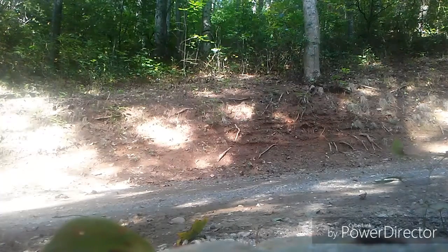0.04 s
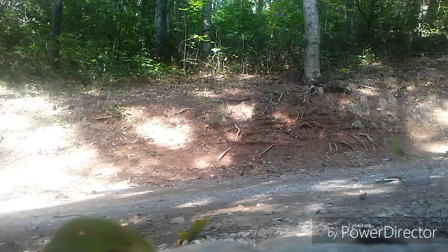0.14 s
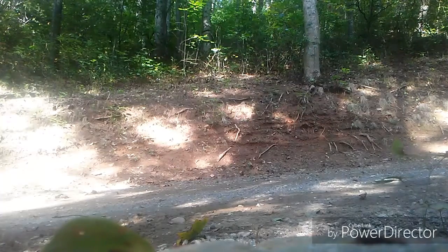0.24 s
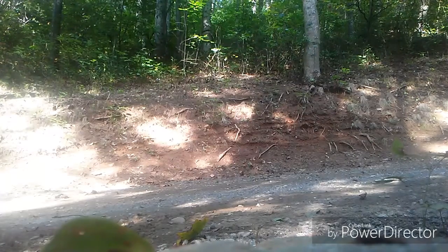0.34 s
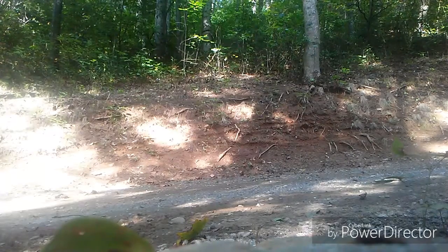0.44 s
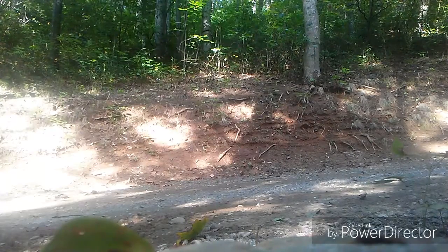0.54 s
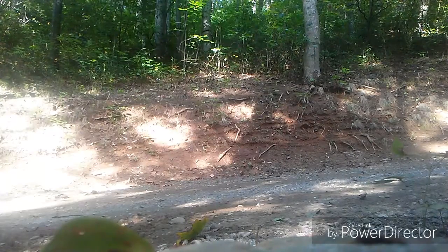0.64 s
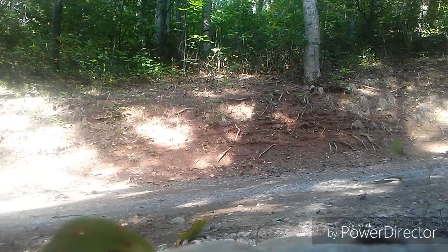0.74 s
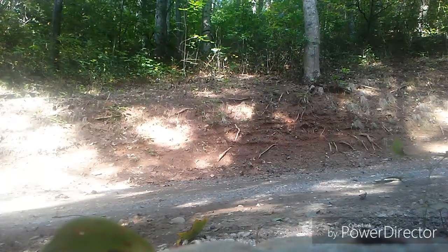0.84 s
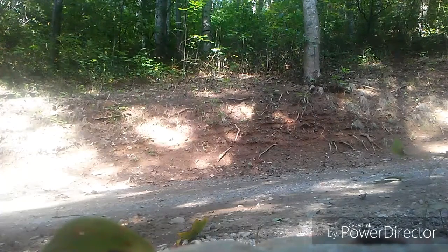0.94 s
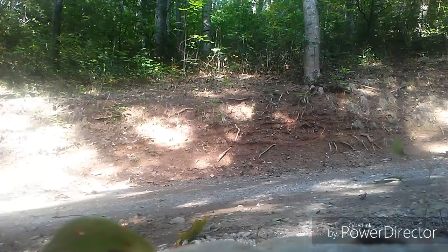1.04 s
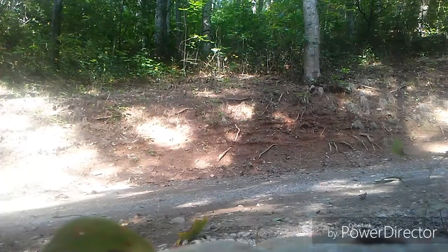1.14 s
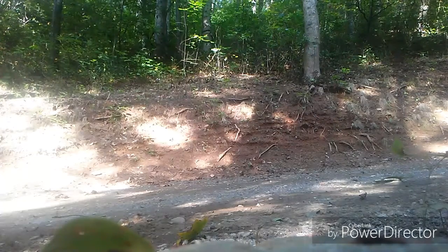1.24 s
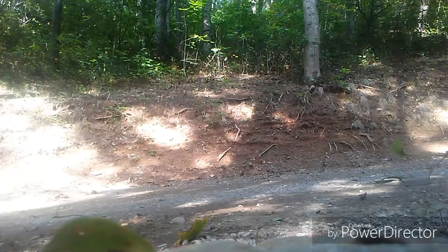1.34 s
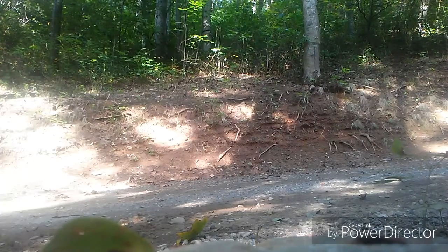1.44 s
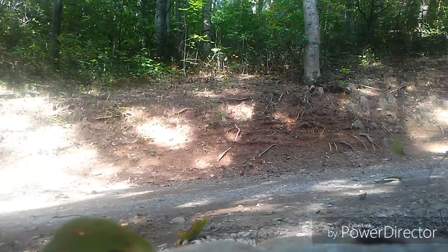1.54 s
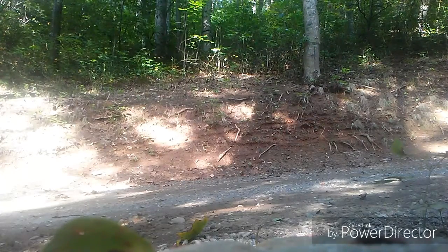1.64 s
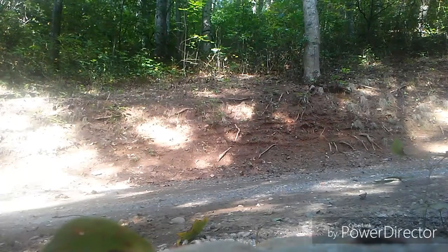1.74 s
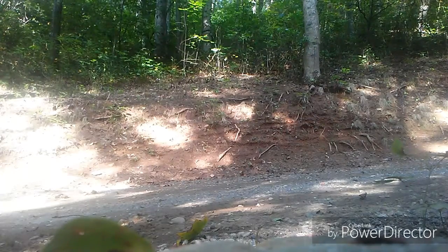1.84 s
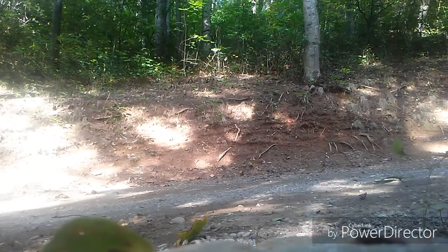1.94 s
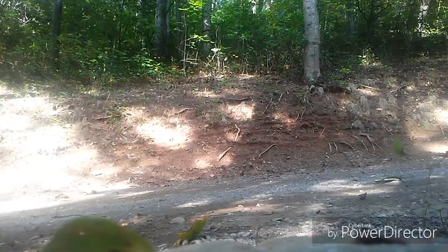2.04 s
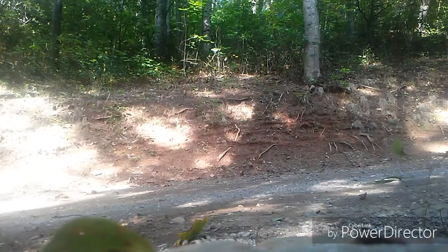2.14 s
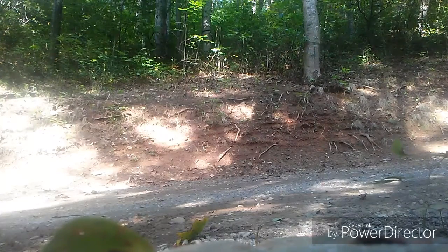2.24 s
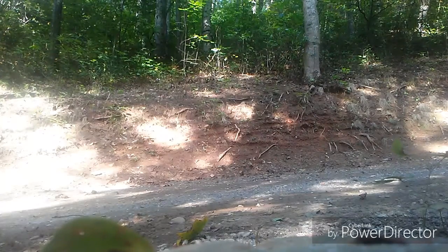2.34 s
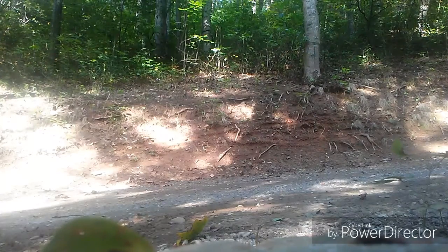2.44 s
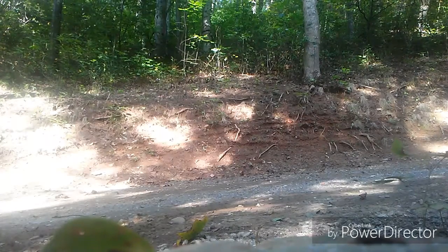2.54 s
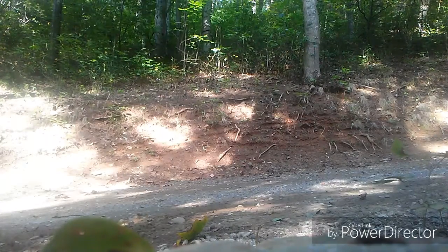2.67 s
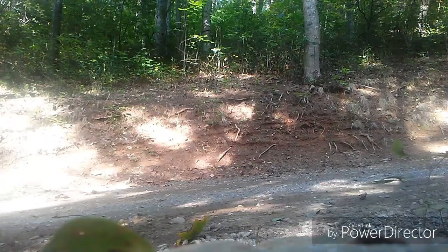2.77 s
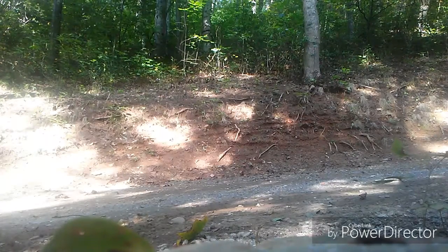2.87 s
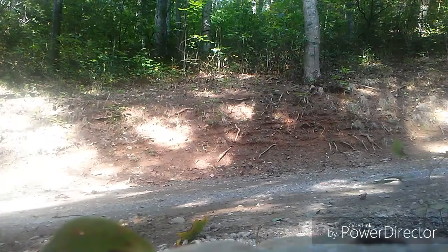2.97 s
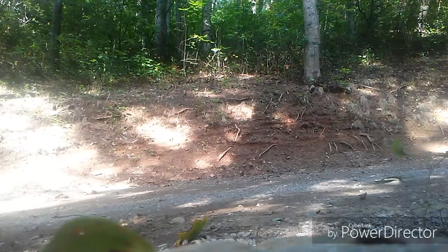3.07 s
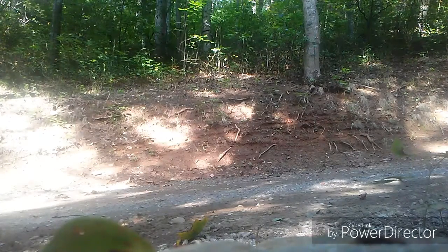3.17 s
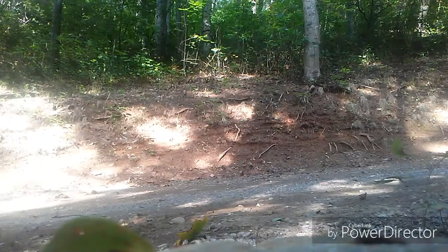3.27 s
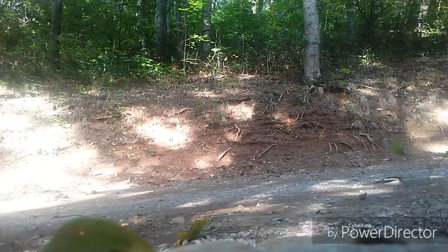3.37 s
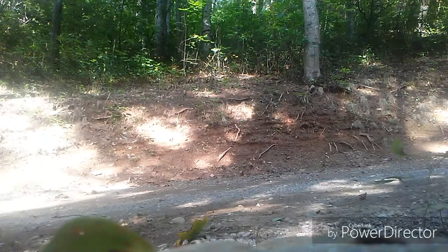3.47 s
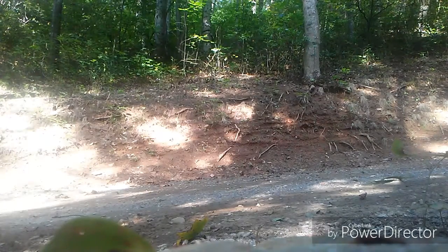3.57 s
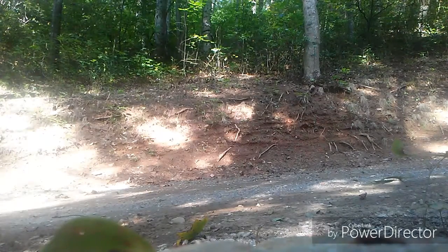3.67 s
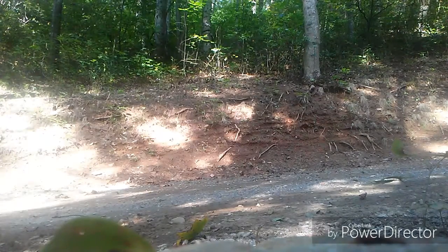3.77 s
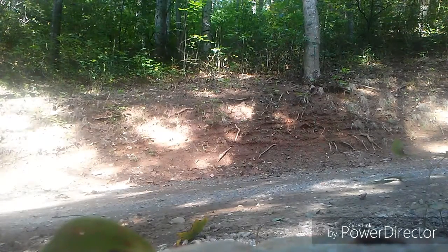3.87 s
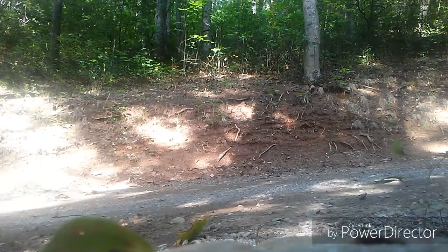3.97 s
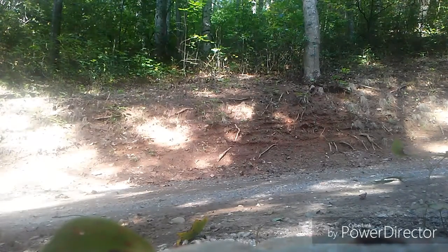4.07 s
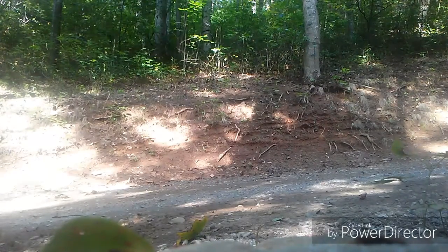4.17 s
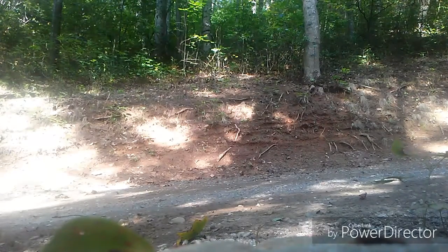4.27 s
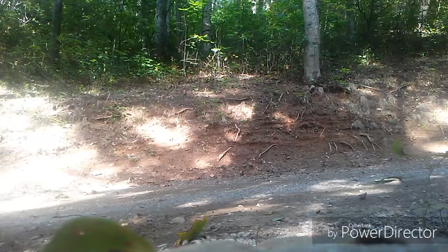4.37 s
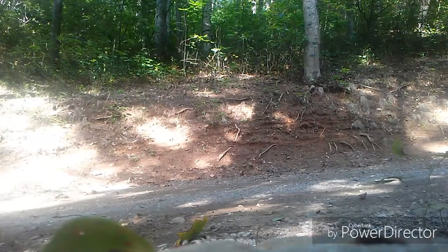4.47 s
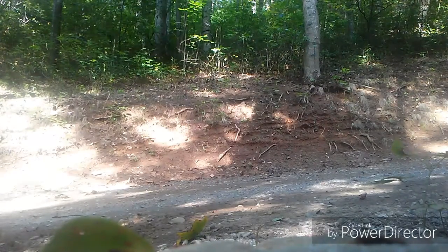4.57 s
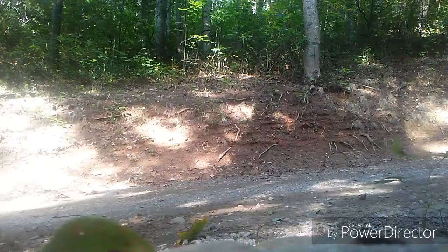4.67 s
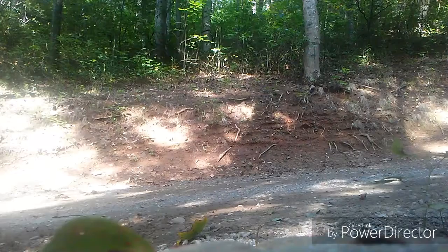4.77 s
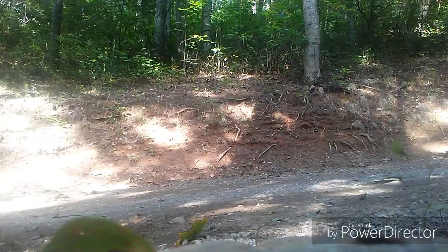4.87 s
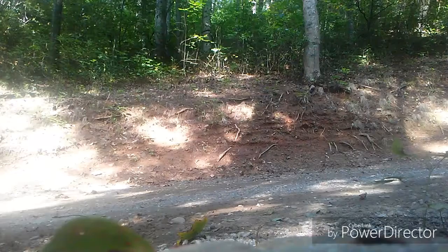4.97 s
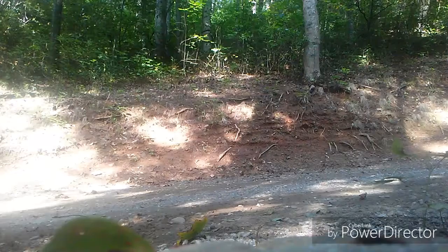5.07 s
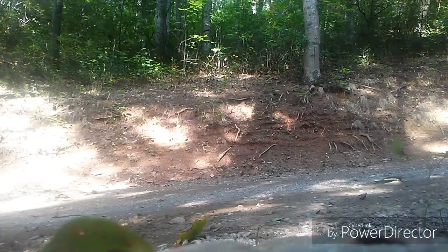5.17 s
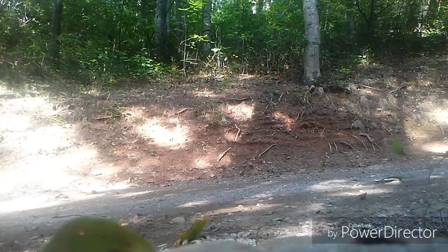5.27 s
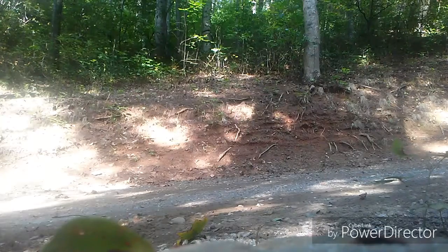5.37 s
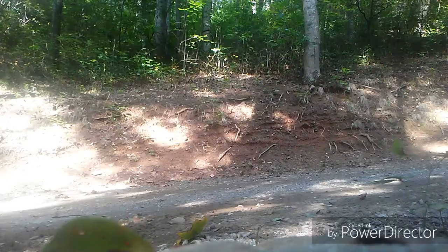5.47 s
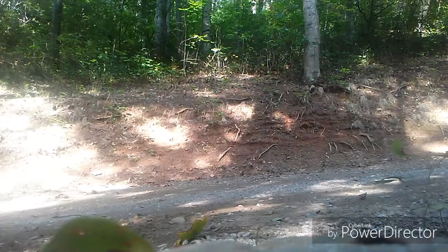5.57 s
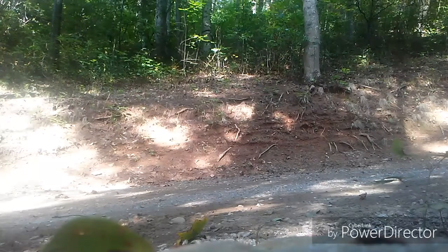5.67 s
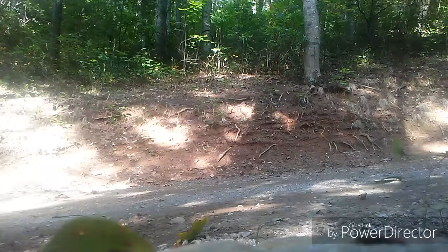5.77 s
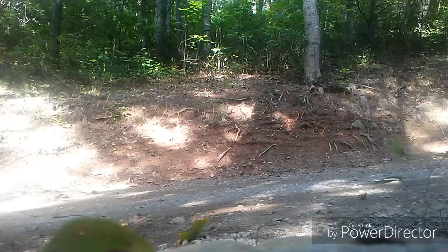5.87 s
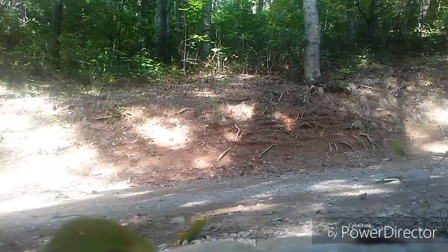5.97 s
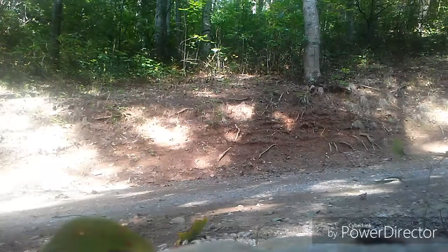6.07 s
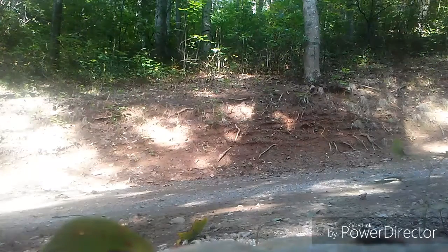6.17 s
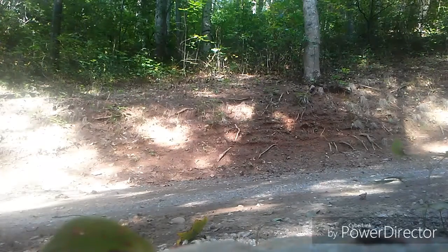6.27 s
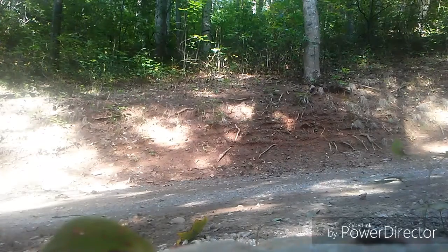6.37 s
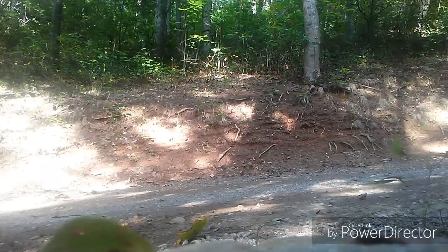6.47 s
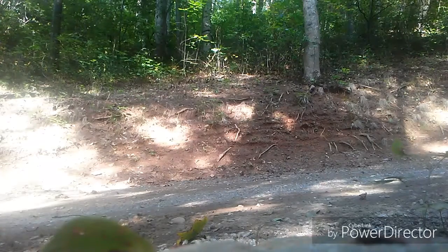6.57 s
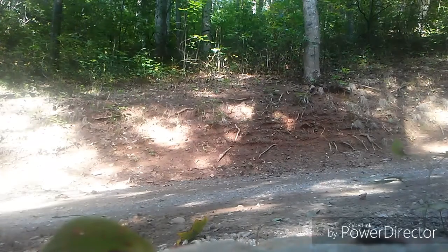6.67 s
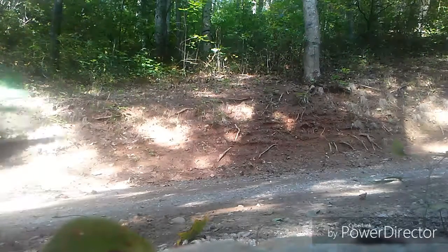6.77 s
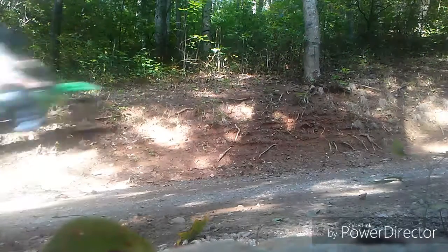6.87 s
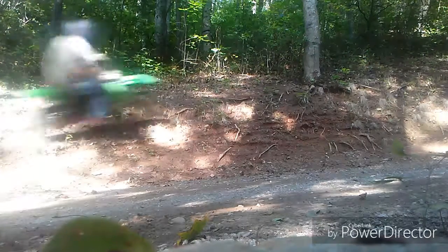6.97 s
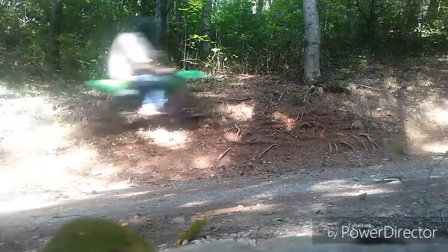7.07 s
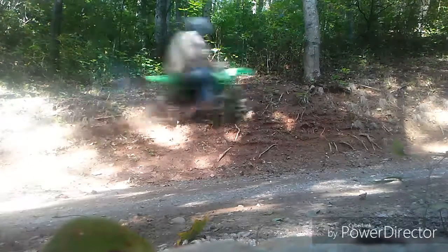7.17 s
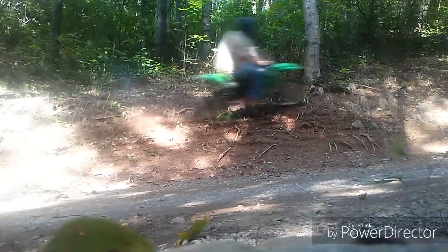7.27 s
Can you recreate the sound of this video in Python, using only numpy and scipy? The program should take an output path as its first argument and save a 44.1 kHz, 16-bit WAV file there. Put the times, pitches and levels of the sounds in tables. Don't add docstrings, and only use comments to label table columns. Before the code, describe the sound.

In a wood, a faint two-stroke dirt bike buzzes far off, dips, then revs up through quick shifts with short throttle cuts that leave an echoing wash among the trunks. It swells in steps, holds a steady drone, then jumps much louder near the end, raspy and crackling with light rut thuds and metallic ringing. A still microphone stays beside the track; the sound stops while the bike is still close.

```python
import sys
import numpy as np
from scipy import signal
from scipy.fft import rfft, irfft, next_fast_len
from scipy.io import wavfile
from scipy.ndimage import uniform_filter1d, minimum_filter1d

SR = 44100
rng = np.random.default_rng(int(sys.argv[2]) if len(sys.argv) > 2 else 0)


def store_pcm(level_fs):
    pcm = np.round(np.clip(level_fs, -1, 1) * 32767).astype(np.int16)
    wavfile.write(sys.argv[1], SR, np.atleast_2d(pcm).T)


def boost(x):
    u = np.asarray(x, float) / 20
    return 10 ** u


N = 322812

# pitch_hz, level_db per Hz
FLOOR_COLOUR = [(3500, -30), (4500, -6), (6000, -6), (8200, -4), (9000, -.1), (10000, -2), (15400, -2),
                (16500, -60)]
# pitch_hz, level_db per Hz
HISS_COLOUR = [(4300, -35.5), (4800, -27.5), (5500, -15.5), (6000, -8.5), (7000, -0.5), (8500, -2.5),
               (10000, -6), (12000, -12), (14000, -19.5), (15400, -25.5)]
# start_s, stop_s, level_db
THUDS = [
    (6.42, 6.47, -47),
    (6.58, 6.684, -42),
    (6.952, 7.0, -49),
    (7.054, 7.09, -47),
    (7.133, 7.16, -51),
]
# time_s, level_db
SIGHTLINE = [(0, -23), (.8, -8.5), (2, -4), (3.5, -1.5), (4.2, -1.5), (4.6, 1.5), (5.65, -0.5), (5.85, -7),
             (6.15, -3.5), (6.6, -3), (6.9, 0.5), (7.1, -4.5), (7.32, -2)]
# start_s, stop_s, pitch_hz, width_hz, level_db
RINGING = [(1.95, 2.35, 2770, 45, -48), (2.05, 2.4, 1600, 40, -45), (2.05, 2.35, 3450, 120, -49),
           (2.5, 2.8, 1600, 40, -47), (2.5, 2.85, 2770, 90, -52), (2.55, 2.8, 3400, 150, -49),
           (3.8, 4.25, 3450, 150, -45), (3.93, 4.3, 2800, 150, -41), (4.46, 4.65, 3450, 150, -44),
           (5.0, 5.6, 2780, 90, -50), (5.85, 6.25, 2060, 80, -37), (5.85, 6.3, 2800, 130, -41),
           (6.33, 6.7, 2780, 250, -31), (6.75, 7.0, 2200, 45, -33), (7.12, 7.34, 2150, 120, -27),
           (6.78, 7.1, 3650, 250, -36), (5.72, 6.2, 8500, 500, -47), (6.05, 6.75, 11800, 600, -54),
           (6.9, 7.34, 6700, 500, -43), (6.8, 7.02, 10000, 1500, -43)]
# pitch_hz, level_db per Hz
FAR_COLOUR = [(60, -56.5), (130, -10), (250, -3.5), (500, 2.5), (700, -4.5), (1000, -8), (1400, -7.5),
              (2400, -11.5), (3000, -12.5), (3900, -16), (4150, -26), (4350, -40), (4700, -62)]
# pitch_hz, level_db per Hz
NEAR_COLOUR = [(60, -25), (130, -12.5), (250, -3.5), (500, -4.5), (700, 7.5), (1000, -1.5), (1400, -1.5),
               (2300, -8.5), (3000, -30), (3900, -21), (4150, -24.5), (4350, -99), (4700, -117)]
# time_s, nearness (0 to 1)
NEARNESS = [(0, 0.21), (3, 0.01), (5.5, 0.1), (5.9, 0.39), (6.8, 0.36), (7, 0.77), (7.32, 0.7)]
# time_s, level_db
APPROACH = [(-0.0, -42.5), (0.21, -43), (0.64, -45), (1.06, -44.5), (1.76, -38.5), (2.15, -32.5),
            (3.07, -35), (3.43, -34), (4.13, -27.5), (4.63, -28), (4.83, -31.5), (5.64, -28.5),
            (5.8, -20.5), (6.14, -18), (6.52, -15.5), (6.78, -17.5), (6.98, -14.5), (7.32, -15)]
# time_s, firings_per_s
ROAD_SPEED = [(0.0, 86.0), (0.37, 70.5), (0.67, 71.1), (1.06, 86.0), (1.39, 95.7), (1.85, 123.6),
              (2.44, 128.4), (3.16, 122.9), (3.58, 132.6), (3.68, 146.5), (3.83, 147.1), (4.27, 141.7),
              (4.62, 125.2), (5.68, 123.8), (6.45, 125.0), (6.95, 122.5), (7.1, 106.6), (7.32, 117.6)]
# peak_s, extra_firings_per_s, rise_s, fall_s
EXTRA_REVS = [(2.119, 57.4, 0.261, 0.134), (2.595, 49.9, 0.179, 0.259), (2.645, 9.2, 0.071, 0.068),
              (3.051, -4.6, 0.038, 0.119), (3.886, 7.5, 0.047, 0.087), (4.108, 23.1, 0.205, 0.103),
              (4.484, 22.3, 0.072, 0.095), (5.088, 6.2, 0.136, 0.401), (5.977, 11.3, 0.161, 0.037),
              (6.033, 7.7, 0.026, 0.102), (6.459, 4.3, 0.351, 0.05), (6.66, 8.9, 0.089, 0.079),
              (7.122, 3.7, 0.05, 0.06)]
# shut_s, open_s, drop_db, regain_s
THROTTLE_CUTS = [
    (2.198, 2.27, -15, .13),
    (2.655, 2.86, -17, .07),
    (4.162, 4.335, -20, .03),
    (.2, .8, -3.5, .08),
    (5.5, 5.69, -8, .06),
    (5.94, 6.03, -8, .05),
    (6.195, 6.31, -12, .03),
    (6.47, 6.55, -4, .04),
    (6.71, 6.78, -7, .04),
    (6.875, 6.92, -5, .03),
]
# start_s, stop_s, order, peak_db
CLEAR_ORDERS = [(0.34, 0.71, 7, -46), (0.584, 0.738, 6, -48), (1.034, 1.322, 5, -44.5),
                (1.314, 1.525, 5, -40.5), (3.01, 3.253, 5, -40.5), (3.34, 3.674, 8, -38),
                (3.39, 3.62, 6, -41), (3.67, 3.958, 9, -40), (3.68, 3.834, 7, -38.5),
                (3.75, 4.024, 5, -34.5), (4.033, 4.564, 5, -33), (4.24, 4.428, 7, -32.5),
                (4.73, 4.9, 13, -41.5), (5.06, 5.46, 7, -39), (5.117, 6.01, 5, -33.5),
                (5.518, 5.662, 13, -31), (5.672, 6.0, 7, -28), (5.68, 5.92, 6, -29), (5.68, 6.3, 9, -27.5),
                (5.71, 5.946, 10, -44), (5.75, 6.002, 8, -33), (5.974, 6.28, 10, -27.5),
                (5.995, 6.28, 7, -23.5), (6.035, 6.526, 8, -21), (6.31, 6.507, 6, -22.5),
                (6.88, 7.353, 5, -17), (6.88, 7.215, 8, -19), (6.95, 7.183, 12, -29), (6.95, 7.32, 7, -17)]
# pitch_hz, level_db
PIPE = [(70.0, -12.0), (100.0, -9), (135.0, -3.6), (185.0, 5), (270.0, 0.75), (390.0, -3.8), (520.0, 1.8),
        (700.0, -9.3)]
NEAR_ORDERS_DB = [-13, 1, 1.5, 2]
# time_s, order, level_db, half_length_s
REFLECTION_FADES = [(0.1, 3, -12.5, 0.25), (0.466, 4, -15, 0.45), (0.747, 3, -7.5, 0.3),
                    (0.84, 2, 4.5, 0.31), (1.426, 3, -7, 0.19), (2.017, 4, -7, 0.42),
                    (2.053, 3, -5.5, 0.27), (2.566, 2, 3.5, 0.056), (2.626, 1, 4.5, 0.044),
                    (3.037, 4, 5.5, 0.037), (3.22, 2, 5, 0.038), (3.25, 3, -7, 0.1), (3.44, 2, 6.5, 0.04),
                    (3.796, 4, -10, 0.15), (4.502, 4, -11, 0.28), (4.64, 3, -6.6, 0.34),
                    (4.803, 1, -5, 0.3), (5.225, 4, -7, 0.7), (5.294, 3, 6.5, 0.031), (5.47, 1, -10, 0.05),
                    (5.496, 3, -15, 0.066), (5.646, 3, -1, 0.036), (5.973, 1, 8, 0.11),
                    (5.998, 4, -12.7, 0.05), (6.278, 2, 6, 0.061), (6.488, 3, 6, 0.39),
                    (6.671, 4, 8, 0.063), (6.93, 3, 4.5, 0.036), (6.968, 2, -4, 0.27),
                    (7.144, 3, -15, 0.089)]


def rms_one(x):
    return x / np.sqrt(np.mean(x ** 2) + 1e-20)


def in_time(rows):
    time_s, values = np.transpose(rows)
    return np.interp(np.arange(N) / SR, time_s, values)


def at_hz(points, hz):
    pitch_hz, level_db = np.transpose(points)
    return np.interp(np.log(hz + 1), np.log(pitch_hz), level_db)


def colour(x, spectrum):
    size = next_fast_len(N)
    hz = np.arange(size // 2 + 1) * SR / size
    return rms_one(irfft(rfft(x, size) * boost(at_hz(spectrum, hz)), size)[:N])


def filtered(x, order, hz, kind):
    return signal.sosfilt(signal.butter(order, hz, kind, fs=SR, output="sos"), x)


def drift(rate_hz):
    r = np.exp(-80 * np.pi * rate_hz / SR)
    noise = rng.standard_normal(N // 40 + 2002)
    slow = signal.lfilter([1], [1, -2 * r, r * r], noise)[2000:]
    return np.interp(np.arange(N) / 40, np.arange(len(slow)), rms_one(slow))


def swell(start_s, stop_s):
    first, last = round(start_s * SR), round(stop_s * SR)
    span = slice(first, min(last, N))
    shape = np.sqrt(np.sin(np.linspace(0, np.pi, last - first)).clip(0))
    return span, shape[:span.stop - first]


def quiet_floor():
    return boost(-75) * colour(rng.standard_normal(N), FLOOR_COLOUR)


def rut_thuds():
    out = np.zeros(N)
    for start_s, stop_s, level_db in THUDS:
        span, shape = swell(start_s, stop_s)
        out[span] += boost(level_db) * shape ** 2
    return out


def ground_rumble(rasp_db, near):
    shaking = boost(rasp_db - 40.5 + 3 * drift(11)) * near ** 2
    faint_bed = boost(-80 + 0.24 * (rasp_db + 49))
    low_noise = rms_one(filtered(rng.standard_normal(N), 2, 75, "low"))
    return (shaking + rut_thuds() + faint_bed) * low_noise


def pebble():
    since_s = np.arange(N) / SR - 7.256
    burst = rng.standard_normal(N) * (since_s > 0) * np.exp(-np.maximum(since_s, 0) / .0006)
    return boost(-32) * np.diff(burst, prepend=0)


def wood(x):
    t60_s, first_trunk_s, trunk_hz = 0.89, 0.048, 316
    t = np.arange(SR) / SR
    tail = rng.standard_normal(SR) * boost(-60 * t / t60_s) * np.clip(t / first_trunk_s, 0, 1) ** 2
    short_waves = filtered(x, 2, trunk_hz, "high")
    return signal.fftconvolve(short_waves, tail / np.sqrt(np.sum(tail ** 2)))[:N]


def ringing_metal(gas):
    out, rattle = np.zeros(N), drift(20)
    for start_s, stop_s, hz, width_hz, level_db in RINGING:
        span, shape = swell(start_s, stop_s)
        r = np.exp(-3 * np.pi * width_hz / SR)
        poles = [1, -2 * r * np.cos(2 * np.pi * hz / SR), r * r]
        ring = signal.sosfilt([[1, 0, -1, *poles]] * 3, gas[span])
        out[span] += boost(level_db - 3.5 + 2.5 * rattle[span]) * shape * rms_one(ring)
    return out


def firing_rate():
    t = np.arange(N) / SR
    rate = in_time(ROAD_SPEED)
    for peak_s, extra, rise_s, fall_s in EXTRA_REVS:
        side_s = np.where(t < peak_s, rise_s, fall_s)
        rate = rate + extra * np.exp(-np.abs((t - peak_s) / side_s) ** 2.5)
    return rate


def throttle_db():
    snap_s, gas_sink_s, gas_lag_s = 0.013, 0.11, 0.068
    t = np.arange(N) / SR
    firing, gas = np.zeros(N), np.zeros(N)
    for shut_s, open_s, drop_db, regain_s in THROTTLE_CUTS:
        since_s = np.maximum(t - shut_s, 0)
        held_db = drop_db * np.clip(1 + (open_s - t) / regain_s, 0, 1)
        firing += held_db * np.minimum(since_s / snap_s, 1)
        gas += held_db * np.minimum(since_s / gas_sink_s, 1)
    late_gas = np.interp(t - gas_lag_s, t, gas)
    return firing, uniform_filter1d(late_gas, size=3500)


def puffed_noise(turn, depth, patchy_db):
    return (1 + depth * np.cos(turn)) * boost(patchy_db * drift(12)) * rng.standard_normal(N)


def gas_hiss(turn, hiss_db):
    return boost(hiss_db) * colour(puffed_noise(turn, depth=0.073, patchy_db=.6), HISS_COLOUR)


def high_orders(turn, per_s, near, fade_db):
    out = np.zeros(N)
    for k in range(5, 14):
        far_db, near_db = at_hz(FAR_COLOUR, k * per_s), at_hz(NEAR_COLOUR, k * per_s)
        level_db = (1 - near) * far_db + near * near_db
        wander = rng.uniform(0, 2 * np.pi) + .07 * k * (1.3 - near) * drift(9)
        out += boost(level_db + fade_db * drift(6.9)) * np.cos(k * turn + wander)
    return out / np.sqrt(uniform_filter1d(out ** 2, size=9000))


def exhaust_rasp(turn, per_s, near, rasp_db, cut_db, gas):
    clean = np.clip(0.3 + .02 * cut_db, 0, 1) * (.35 + .65 * near)
    roar = (1 - near) * colour(gas, FAR_COLOUR) + near * colour(gas, NEAR_COLOUR)
    orders = high_orders(turn, per_s, near, fade_db=3.5)
    return boost(rasp_db) * (np.sqrt(clean) * orders + 0.96 * np.sqrt(1 - clean) * roar)


def clear_orders(turn, rasp_db):
    out = np.zeros(N)
    for start_s, stop_s, order, peak_db in CLEAR_ORDERS:
        span, shape = swell(start_s, stop_s)
        effort_db = rasp_db[span] - rasp_db[span].mean()
        phase = rng.uniform(0, 2 * np.pi)
        out[span] += boost(peak_db + effort_db) * shape * np.cos(round(order) * turn[span] + phase)
    return out


def firing_cracks(turn):
    firings = np.flatnonzero(np.diff(np.floor(turn / (2 * np.pi))))
    clicks = np.zeros(N)
    clicks[firings] = boost(2.3 * rng.standard_normal(len(firings)))
    echo = np.roll(clicks, round(0.001 * SR))
    cracks = colour(clicks - 0.5 * echo, NEAR_COLOUR)
    return rms_one(filtered(cracks, 2, 900, "high"))


def low_orders_db(per_s, near, engine_db):
    t = np.arange(N) / SR
    out = np.array([engine_db + at_hz(PIPE, k * per_s) + near * near_db
                    for k, near_db in enumerate(NEAR_ORDERS_DB, 1)])
    for time_s, order, level_db, half_length_s in REFLECTION_FADES:
        out[round(order) - 1] += level_db * np.exp(-((t - time_s) / half_length_s) ** 2)
    return out


def exhaust_tones(turn, orders_db, flutter_db):
    burn, out = drift(15.6), np.zeros(N)
    for k, order_db in enumerate(orders_db, 1):
        flutter = flutter_db * (burn + .7 * k * drift(16))
        out += np.sqrt(2) * boost(order_db + flutter) * np.cos(k * turn - 0.31 * (k - 1))
    return out


def scene():
    per_s = firing_rate()
    near = np.clip(in_time(NEARNESS), 0, 1)
    engine_db = in_time(APPROACH)
    cut_db, gas_db = throttle_db()
    octaves = np.log2(per_s / 130)
    rasp_db = engine_db - 1 + 1.5 * octaves + 0.2 * gas_db - 0.5 * near
    hiss_lull_db = .45 * (1 - 1.5 * near).clip(0) * gas_db
    hiss_db = engine_db - 21.5 + 9 * octaves + hiss_lull_db + in_time(SIGHTLINE)
    turn = 2 * np.pi * np.cumsum(per_s * (1 + .002 * drift(30))) / SR

    tones = exhaust_tones(turn, low_orders_db(per_s, near, engine_db + cut_db), flutter_db=1.1 - near)
    scatter = boost(-1.5 - 12 * near) * wood(tones)
    gas = puffed_noise(turn, depth=0.038, patchy_db=1.11)
    rasp = exhaust_rasp(turn, per_s, near, rasp_db, cut_db, gas)
    cracks = boost(rasp_db - 7 + cut_db + 2.2 * drift(3.7)) * near * firing_cracks(turn)
    clear = boost(1.2 * cut_db) * clear_orders(turn, rasp_db)
    engine = tones + scatter + rasp + cracks + clear + ringing_metal(gas)
    engine = filtered(engine, 4, 70, "high")

    background = quiet_floor() + ground_rumble(rasp_db, near) + pebble()
    return (background + gas_hiss(turn, hiss_db) + engine)[None]


def band_limit(x):
    return signal.sosfilt(signal.butter(12, 15500, fs=SR, output="sos"), x)


def record(dry):
    ceiling = .99
    room_left = minimum_filter1d(ceiling / np.maximum(np.abs(dry), ceiling), size=401)
    limited = dry * uniform_filter1d(room_left, size=401)
    return band_limit(limited)


dry = scene()
out = record(dry)
store_pcm(out)
```